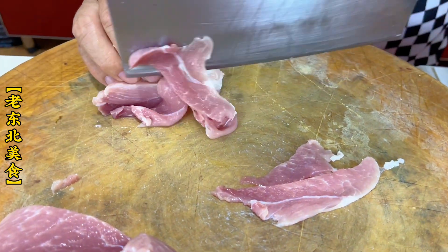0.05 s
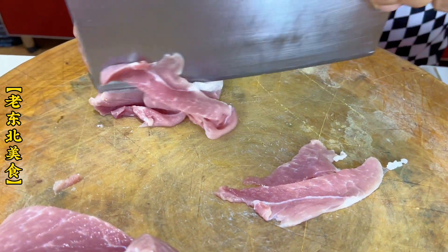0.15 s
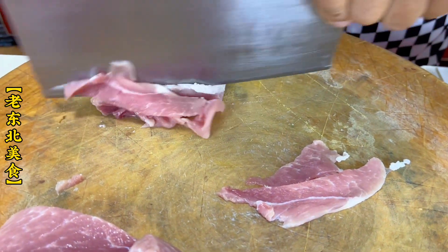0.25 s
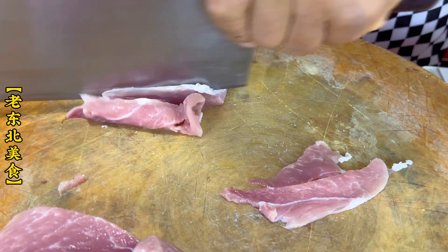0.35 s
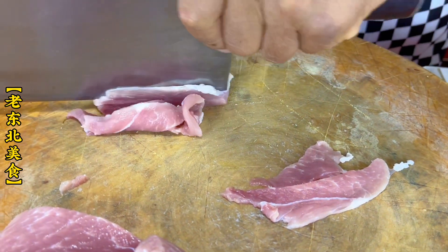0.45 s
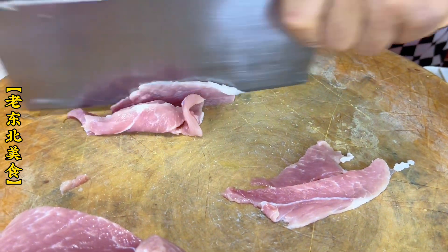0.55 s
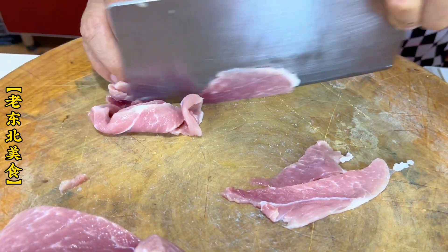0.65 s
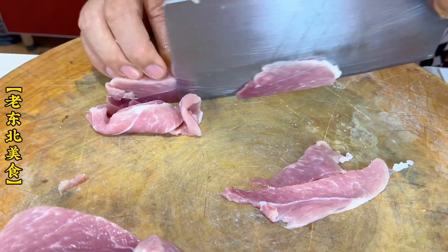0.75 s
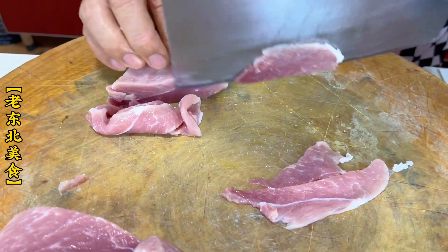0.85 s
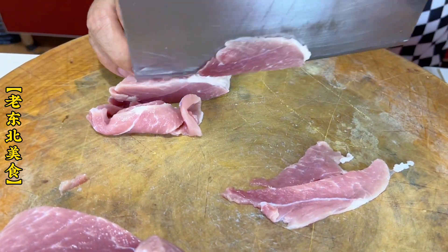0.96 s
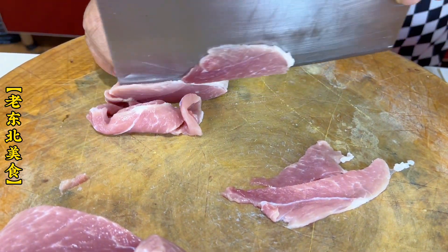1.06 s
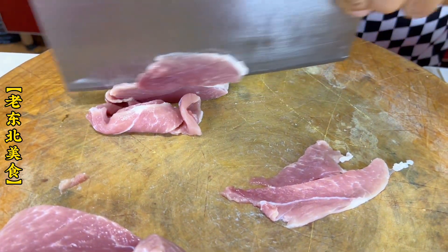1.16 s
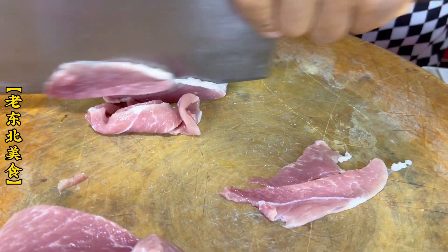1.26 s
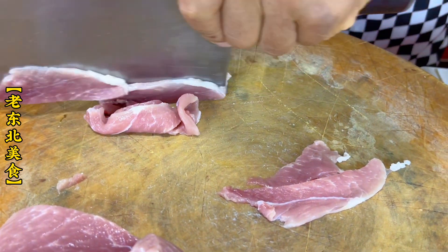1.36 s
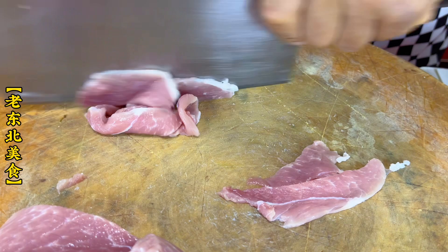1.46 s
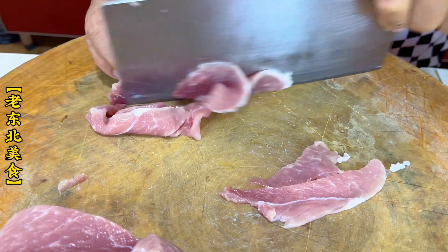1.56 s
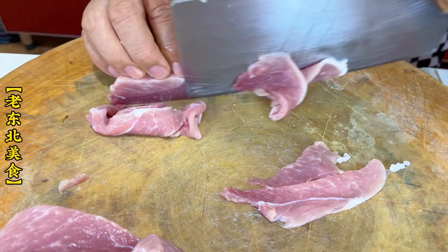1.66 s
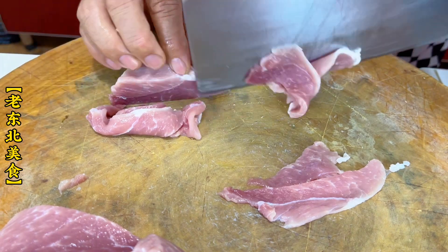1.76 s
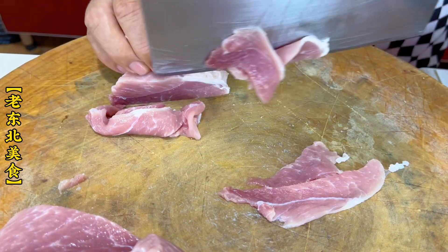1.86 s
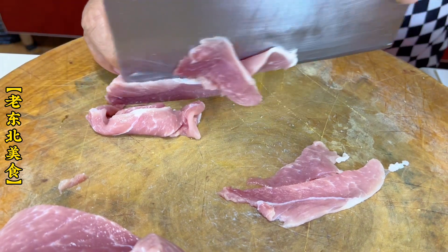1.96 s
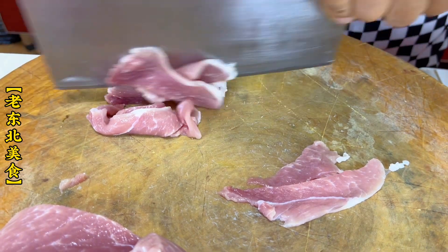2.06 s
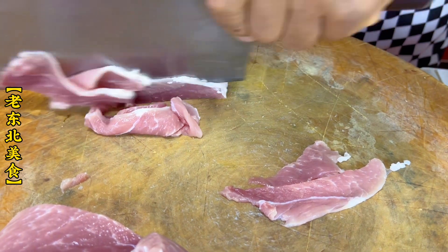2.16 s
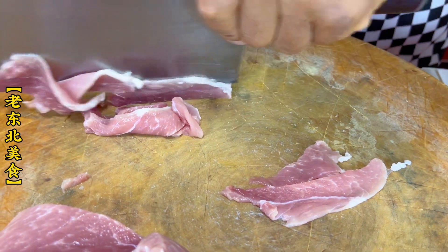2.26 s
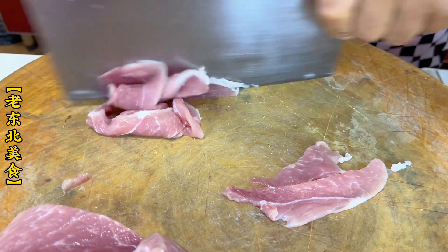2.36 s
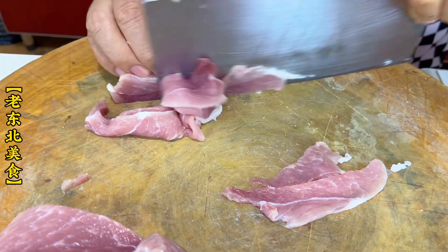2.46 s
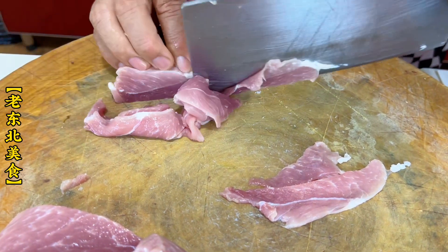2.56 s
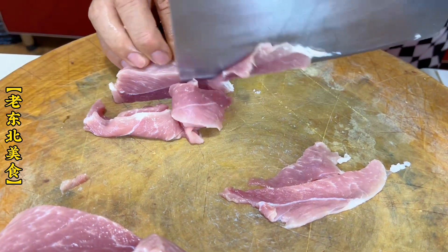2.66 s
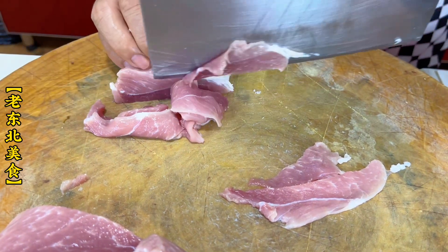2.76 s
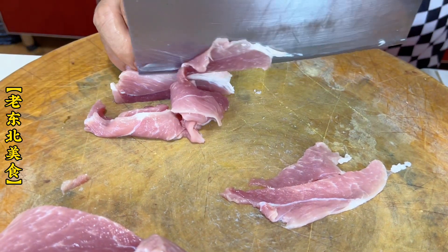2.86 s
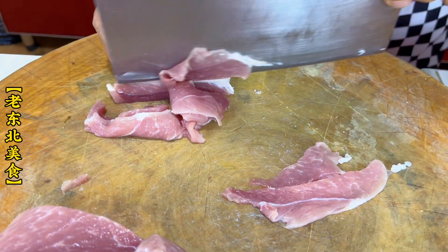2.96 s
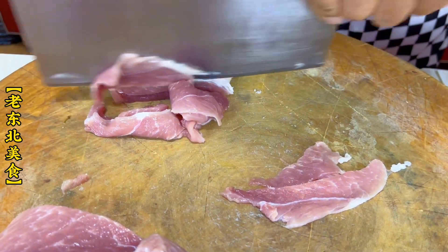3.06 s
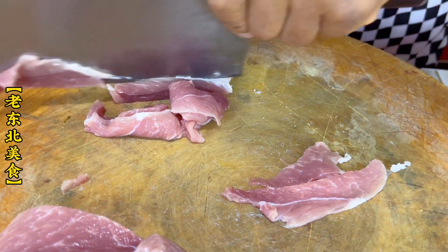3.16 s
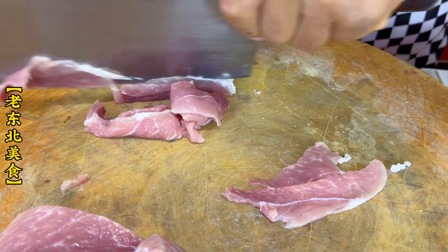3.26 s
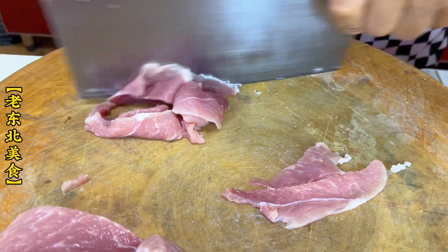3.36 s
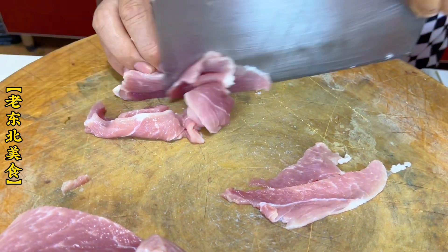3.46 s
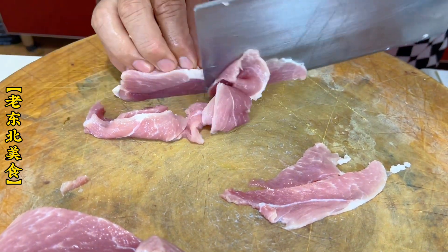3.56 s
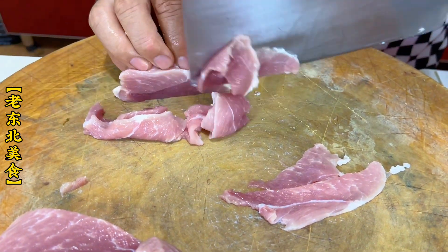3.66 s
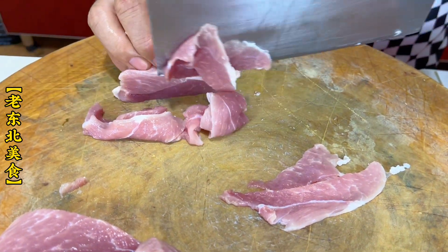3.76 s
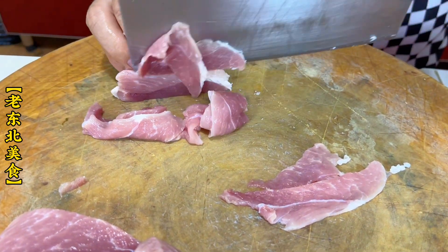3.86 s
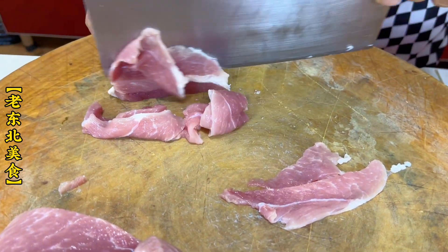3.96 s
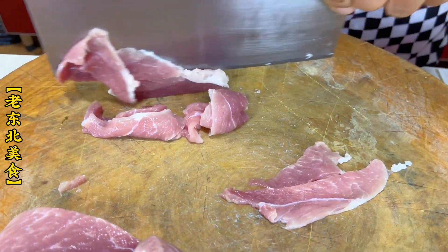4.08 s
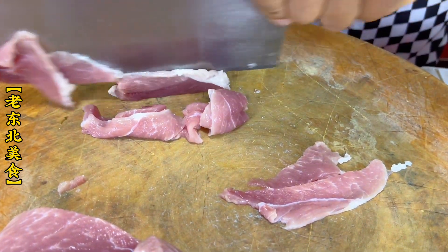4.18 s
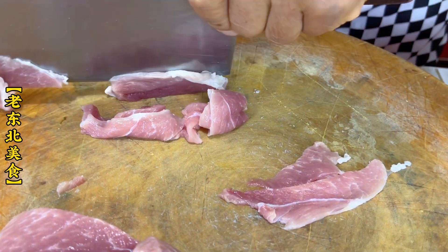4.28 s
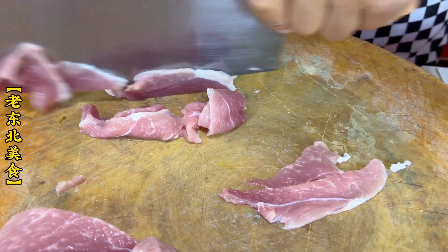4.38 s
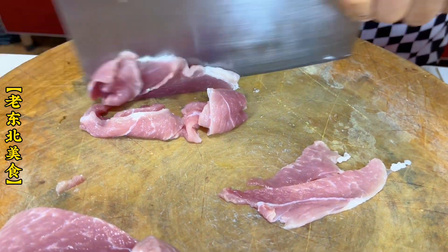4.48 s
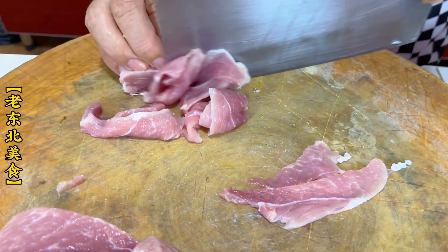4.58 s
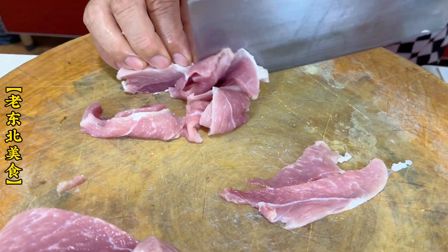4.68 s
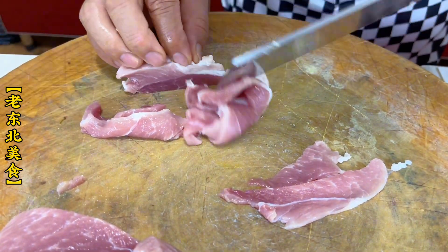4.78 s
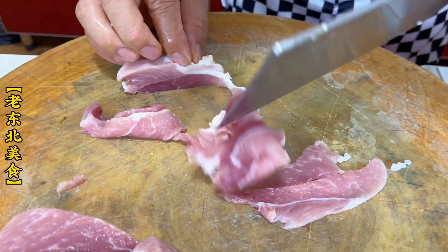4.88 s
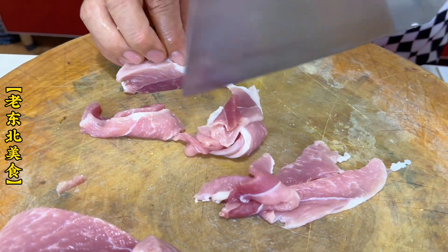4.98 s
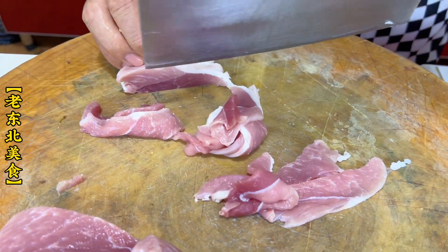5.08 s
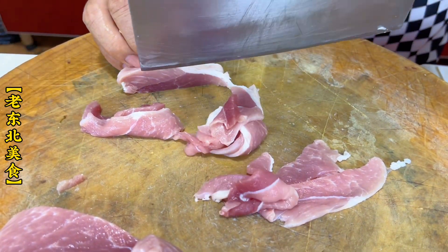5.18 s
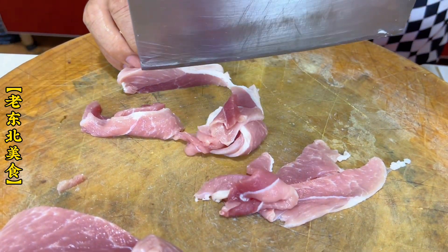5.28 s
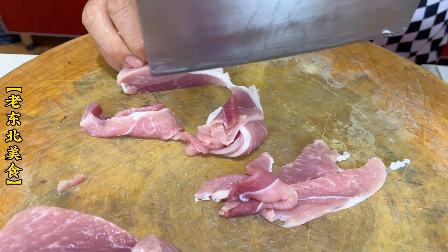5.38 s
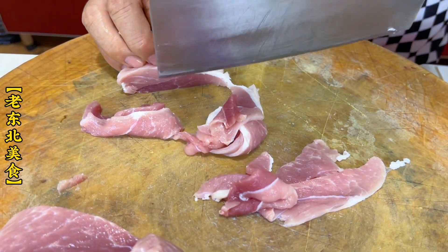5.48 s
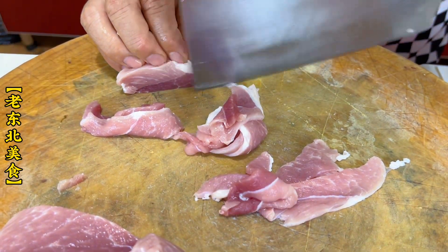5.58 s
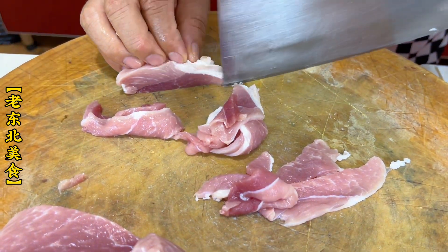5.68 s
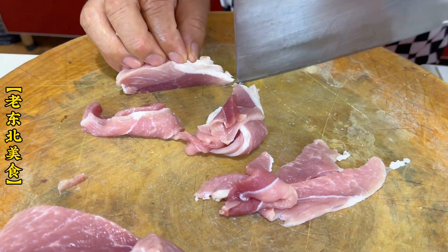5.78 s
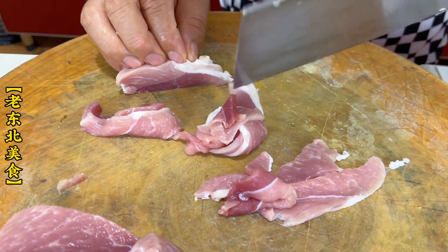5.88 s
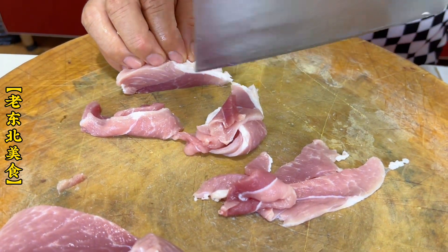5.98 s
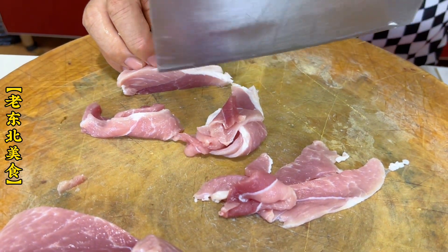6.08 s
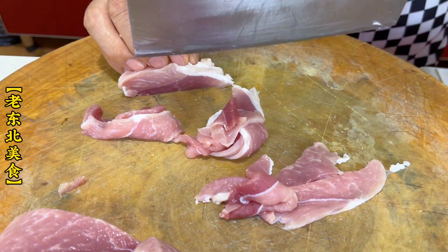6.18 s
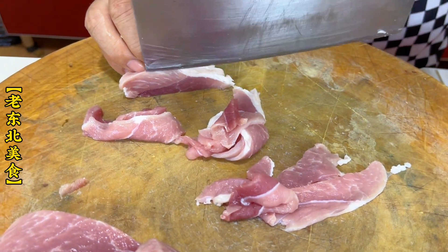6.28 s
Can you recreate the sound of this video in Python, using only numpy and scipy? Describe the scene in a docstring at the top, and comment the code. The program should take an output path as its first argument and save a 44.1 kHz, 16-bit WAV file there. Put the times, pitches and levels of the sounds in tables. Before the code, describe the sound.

A close stereo sound of a cleaver slicing raw pork on a thick wooden board in a small, hard-walled kitchen. A low fan hum and soft rush of air run throughout. At about 0.15 s a light, wet, grainy draw swells and fades; at 0.5 s a stronger rasping push bites in and meets the board at 0.6 s with a dull, deep thud. The pair repeats: draws near 1.1, 2.0, 2.95 and 3.9-4.3 s, the last broken and hesitant; pushes near 1.4, 2.3, 3.3 and 4.4 s, with thuds at 1.55, 2.45, 3.45 and 4.57 s, the one at 3.45 especially low and soft. Small damped steel ticks fall near 1.0, 1.95 and 3.9 s, with a faint tap at 1.94 s. After a barely audible slide at 4.7 s, mostly fan remains until 5.64 s, when one loud, harder, woody knock with a crack and slight scrape lands, decaying briefly into fan hum.

```python
"""A cleaver slices raw pork on a thick wooden board in a small kitchen, close to the microphone.
Light draws and harder pushes are wet stick-slip friction: dense random clicks coloured by the blade.
The edge excites the board's modes in a thud and grinds on the wood; light touches make the blade tick.
At the end it knocks once on the board. Decaying noise forms the room; a fan hums in a rush of air."""
import sys
import numpy as np
from scipy import signal
from scipy.fft import rfft, irfft, next_fast_len
from scipy.io import wavfile
from scipy.ndimage import uniform_filter1d

SR = 44100
rng = np.random.default_rng(int(sys.argv[2]) if len(sys.argv) > 2 else 0)


def generate_wav(sig):
    """Save sig (samples, or channels by samples) to the path in sys.argv[1] as 16-bit PCM at SR."""
    pcm = np.round(np.clip(np.atleast_2d(sig).T, -1, 1) * 32767).astype(np.int16)
    wavfile.write(sys.argv[1], SR, pcm)


N = 279329
TIME = np.arange(N) / SR
HZ = np.maximum(np.arange(N + 1) * SR / (2 * N), 1)

# All levels are relative.
# blade drawn over the meat: start_s, length_s, fastest_share (of length, 0-1), level_db,
# treble_db (relative to the rasp)
DRAW_STROKES = [(0.146, 0.35, 0.61, -56, -7), (1.081, 0.33, 0.78, -56, -5.5),
                (1.978, 0.32, 0.59, -54, -6.5), (2.953, 0.33, 0.57, -59, -6.5),
                (3.852, 0.051, 0.6, -56.5, -10), (3.941, 0.19, 0.33, -61.5, -9.5),
                (4.061, 0.31, 0.62, -58.5, -5.5), (4.680, 0.23, 0.27, -73.5, -9),
                (5.641, 0.25, 0.12, -63, -5)]
# blade pushed through the meat: start_s, reach_board_s (after start), entry_db, board_db,
# treble_db (relative to the rasp), ease_db_per_s (after reaching the board)
PUSH_STROKES = [(0.507, 0.12, -55.5, -46, -8.5, 124), (1.422, 0.14, -56, -45, -7, 132),
                (2.304, 0.17, -51, -47.5, -9, 165), (3.287, 0.18, -52.5, -53, -6, 118),
                (4.373, 0.21, -54, -53, -7, 108)]
# spectral envelope of the draws: frequency_hz, gain_db
DRAW_SPECTRUM = [(300, -26), (750, 8.5), (1250, 4.5), (1800, -2.5), (2900, 3.5), (4500, 0.5), (6500, 0.5),
                 (8500, -10.5), (10200, -9.5), (12500, -18.5), (15000, -26)]
# spectral envelope of the pushes: frequency_hz, gain_db
PUSH_SPECTRUM = [(30, -16), (170, 9), (450, 3), (750, 10.5), (1150, 2), (1750, -1), (2800, 3), (4500, -1),
                 (6500, -3.5), (8700, -18.5), (11300, -19.5), (13000, -27), (15000, -36)]
# resonances of the rubbed blade: frequency_hz, width_hz, lift_db
BLADE_RESONANCES = [(1223, 136, 8), (2340, 170, 3.5), (3060, 160, 3.5), (4450, 140, 5), (6240, 180, 6),
                    (10040, 360, 4)]
# correlation of the rubbing at the two ports: frequency_hz, likeness (0-1)
RUB_CORRELATION = [(300, 1), (750, 0.68), (1200, 0.95), (1700, 0.64), (10000, 0.54)]
# edge meets the board: start_s, level_db, contact_cutoff_hz (lower is softer), rock_db
BOARD_KNOCKS = [(0.625, -5.5, 222, -35), (1.553, -6, 167, -32), (1.941, -21.5, 400, -59),
                (2.454, -9, 156, -40), (3.461, -3, 90, -32), (4.568, -8.5, 132, -39.5),
                (5.641, 2, 1050, -27.5)]
# modes of the board: frequency_hz, width_hz, gain_db
BOARD_MODES = [(69.8, 60, 33), (118.3, 67, 33.5), (187.4, 28.5, 35), (291.4, 37, 31), (424, 140, 21),
               (523, 117, 17.5), (720, 71, 22), (970, 160, 17.5), (1275, 130, 13), (1567, 77, 13.5),
               (1960, 36, 11), (3180, 210, 9.5)]
# edge grinding along the wood: centre_s, half_length_s, level_db, frequency_hz
EDGE_GRINDS = [(0.627, 0.01, -36.5, 733), (1.547, 0.013, -40, 644), (2.446, 0.013, -53.5, 940),
               (3.384, 0.055, -53, 1195), (4.45, 0.049, -51, 1155), (5.644, 0.0048, -33, 938)]
# light touches of the blade: start_s, level_db, tilt_db_per_octave
BLADE_TICKS = [(1.026, -41.5, -0.5), (1.965, -41, -1.5), (3.881, -37.5, 2.5), (4.789, -63.5, 9.5)]
# modes of the hand-damped blade: frequency_hz, level_db, t60_s
BLADE_MODES = [(1213, 5.5, 0.025), (1319, 2.5, 0.047), (1864, -2, 0.037), (2200, -7, 0.027),
               (3300, -10, 0.097), (3850, 0.5, 0.016), (4420, -8.5, 0.017), (5480, -8, 0.01),
               (6760, -6.5, 0.034), (11700, -22, .015)]
# spectral shape of the kitchen's air noise: frequency_hz, density_db
AIR_SPECTRUM = [(15, -63), (25, -10.5), (49, -16), (86, 2.5), (124, -8.5), (208, -6), (306, -12),
                (340, -19.5), (377, -16), (407, -22.5), (463, -18), (979, -28), (1560, -26), (2240, -42.5),
                (12000, -70), (15600, -109), (22000, -120)]
# tones of the fan: frequency_hz, level_db
FAN_TONES = [(78, -59.5), (102.3, -52), (204.6, -58), (371.4, -69.5), (4194, -94.5)]
# correlation of diffuse sound, left to right: frequency_hz, likeness (0-1)
DIFFUSE_CORRELATION = [(50, 1), (250, 0.73), (500, 0.3), (1000, 0), (12000, 0.19)]
# phase of near sound between the two microphone ports: frequency_hz, left_lead_rad
PORT_LEAD = [(100, -0.15), (550, -0.24), (750, 0.68), (1100, 1.6), (2500, 1.13), (7000, 1.48),
             (11500, 1.04)]
# sensitivity of the two ports: frequency_hz, left_minus_right_db
PORT_SENSITIVITY = [(100, .4), (420, 1.5), (700, -6), (1150, 0), (1550, -3.5), (1850, 2.5), (2700, -1),
                    (4000, 2.5), (6500, -2), (11000, 0)]


def draw_strokes():
    """Friction grows with sliding speed: each draw speeds up and slows down in one arch."""
    rasp_law, hiss_law = 1.2, 2.13  # amplitude grows as these powers of speed
    rasp, hiss = np.zeros(N), np.zeros(N)
    for start, length, fastest, level_db, treble_db in DRAW_STROKES:
        turn = np.interp(TIME, [start, start + length * fastest, start + length], [0, 1, 0])
        speed = np.sin(np.pi / 2 * turn)
        rasp += undb(level_db) * speed ** rasp_law
        hiss += undb(level_db + treble_db) * speed ** hiss_law
    return rasp, hiss


def push_strokes():
    """Friction follows pressure: the edge bites, bears down to the board, then eases off and stops."""
    bite_s, length_s, stop_s = 0.051, 0.39, 0.066  # stop_s is the last part of length_s
    rasp, hiss = np.zeros(N), np.zeros(N)
    for start, reach_s, entry_db, board_db, treble_db, ease_db_per_s in PUSH_STROKES:
        t = TIME - start
        ramp = np.clip(np.minimum(t / bite_s, (length_s - t) / stop_s), 0, 1)
        moving = np.sin(np.pi / 2 * ramp) ** 2
        pressure_db = np.interp(t, [0, reach_s], [entry_db, board_db])
        eased_db = ease_db_per_s * np.maximum(t - reach_s, 0)
        stroke = moving * undb(pressure_db - eased_db)
        rasp += stroke
        hiss += stroke * undb(treble_db)
    return rasp, hiss


def friction(strokes, colour, slips_per_s, catch_db, patchy_db, rasp_db, hiss_db):
    """Stick-slip: wet fibres catch and slip on steel as dense tiny clicks, coloured by the blade."""
    happens = rng.random(N) < slips_per_s / SR
    slip_size = happens * undb(catch_db * walk(45))
    # slips lie all along the edge, so the two ports hear them differently, except in the bass
    mid, side = mid_and_side(RUB_CORRELATION, lambda: slip_size * rng.standard_normal(N))
    # each patch of meat under the blade favours its own pitches
    slips = mottle(ports(mid) + np.array([side, -side]), patchy_db)
    colour_db = over_hz(colour)
    for hz, width, lift_db in BLADE_RESONANCES:
        colour_db = colour_db + lift_db / (1 + (2 * (HZ - hz) / width) ** 2)
    gain = undb(colour_db)
    low = 1 / (1 + (HZ / 7000) ** 12)
    rasp = unit(shape(slips, gain * low))
    hiss = unit(shape(slips, gain * (1 - low)))
    rasp_envelope, hiss_envelope = strokes
    return undb(rasp_db) * rasp * rasp_envelope + undb(hiss_db) * hiss * hiss_envelope


def knocks(bend_lag_s, crack_db, crack_t60, crack_hz, rock_s, rock_hz, rock_t60):
    """Impact excites the board's modes; a moment later the heavy board rocks on its table."""
    out, t = np.zeros(N), TIME[:SR // 2]
    f = np.maximum(np.fft.rfftfreq(len(t), 1 / SR), 1)
    board = 0
    for k, (hz, width, gain_db) in enumerate(BOARD_MODES):
        # neighbouring modes swing in opposite directions at the listening point
        board = board + (-1) ** k * undb(gain_db) / (1 + 1j * (f ** 2 - hz ** 2) / (f * width))
    # bending waves are slower at low pitch, so the knock falls from a tock into a thud
    bending = np.exp(-2j * np.pi * 2 * bend_lag_s * np.sqrt(f * BOARD_MODES[0][0]))
    hard_hz = BOARD_KNOCKS[-1][2]
    for start, level_db, soft_hz, rock_db in BOARD_KNOCKS:
        body = irfft(board * bending / (1 + 1j * f / soft_hz) ** 2)
        # the harder the contact, the more it crushes wood fibres into a crack
        crush = rng.standard_normal(len(t)) * swell(t, 0.0015, crack_t60) * (soft_hz / hard_hz) ** 2
        crack = undb(crack_db) * irfft(rfft(crush) / (1 + 1j * f / crack_hz) ** 3)
        add(out, start, undb(level_db) * (body + crack)[:len(t) // 2])
        upper = 0.77 * ring(t, 211, 0.12) / np.hypot(1, (400 / soft_hz) ** 2)
        add(out, start + rock_s, undb(rock_db) * (ring(t, rock_hz, rock_t60) + upper))
    return out


def grinds(width_hz):
    """Sliding contact: the edge drags over wood and rubs a narrow band of it into sound."""
    out = np.zeros(N)
    for centre, half_s, level_db, hz in EDGE_GRINDS:
        band = 1 / (1 + (2 * (HZ - hz) / width_hz) ** 2)
        rub = unit(shape(rng.standard_normal(N), band))
        out += undb(level_db) * rub * np.exp(-((TIME - centre) / half_s) ** 2)
    return out


def ticks(scuff_db, scuff_rise_s, scuff_t60, scuff_hz):
    """Light impact: the blade's damped modes ring briefly under a tiny scuff of noise."""
    steel, scuff, t = np.zeros(N), np.zeros(N), TIME[:SR // 5]
    for start, level_db, tilt_db in BLADE_TICKS:
        modes = np.zeros(len(t))
        for hz, mode_db, t60 in BLADE_MODES:
            late = t - 0.0037 * rng.random()  # the modes start at slightly scattered times
            modes += undb(mode_db + tilt_db * np.log2(hz / 3000)) * ring(late, hz, t60)
        add(steel, start, undb(level_db) * modes / 2)
        noise = rng.standard_normal(len(t)) * swell(t, scuff_rise_s, scuff_t60)
        add(scuff, start, undb(level_db + scuff_db) * noise)
    return steel + shape(scuff, 1 / (1 + (HZ / scuff_hz) ** 4))


def ports(x):
    """Phase difference: near sound is offset between the ports; long waves reach both nearly alike."""
    half = np.exp(.5j * over_hz(PORT_LEAD) * np.minimum(HZ / 550, 1))
    return np.array([shape(x, half), shape(x, 1 / half)])


def room(x, low_db, high_db, low_t60, high_t60, gap_s):
    """Reverberation from hard kitchen walls: a low boom and a briefer bright tail of decaying noise."""
    low = 1 / (1 + (HZ / 600) ** 2)
    response = 0
    for band, level_db, t60 in [(low, low_db, low_t60), (1 - low, high_db, high_t60)]:
        unit_energy = np.sqrt(2 * np.log(1000) / (t60 * SR))  # evens out the length of the decay
        response = response + undb(level_db) * diffuse(band) * fade(TIME - gap_s, t60) * unit_energy
    return signal.fftconvolve(x[None], response[:, :SR], axes=1)[:, :N]


def background(air_db, patchy_db, waver_db, drift_rad):
    """Turbulence makes the fan's broadband rush of air; wavering sine tones make its hum."""
    air = unit(mottle(diffuse(undb(over_hz(AIR_SPECTRUM))), patchy_db)) * undb(air_db)
    hum = np.zeros(N)
    for hz, level_db in FAN_TONES:
        amplitude = np.sqrt(2) * undb(level_db + waver_db * walk(7))
        hum += amplitude * np.sin(2 * np.pi * hz * TIME + drift_rad * walk(6))
    return air + hum


def mid_and_side(correlation, noise):
    """Partial correlation: two independent noises, weighted by how alike left and right are."""
    like = over_hz(correlation)
    return [shape(noise(), np.sqrt(1 + sign * like)) for sign in (1, -1)]


def diffuse(gain):
    """Diffuse field: stereo noise from all sides, with the bass alike left and right."""
    mid, side = mid_and_side(DIFFUSE_CORRELATION, lambda: rng.standard_normal(N))
    return shape(np.array([mid + side, mid - side]), gain) / np.sqrt(2)


def mottle(x, depth_db):
    """Spectral fluctuation: random patches of pitch swell and sink for a few hundredths of a second."""
    spectra = signal.stft(x, nperseg=512)[2]
    patches = rng.standard_normal(spectra.shape[1:])
    patches = uniform_filter1d(patches, size=3, axis=0)
    patches = uniform_filter1d(patches, size=5, axis=1)
    return signal.istft(spectra * undb(depth_db * unit(patches)))[1][:, :N]


def walk(rate):
    """Smoothed random steps, `rate` per second: a wander with a spread near 1."""
    k = int(SR / rate)
    steps = np.repeat(rng.standard_normal(N // k + 1), k)[:N]
    return 1.55 * uniform_filter1d(steps, k)


def fade(t, t60):
    """Exponential decay from t = 0, falling 60 dB in t60 seconds."""
    return (t >= 0) * np.exp(-np.log(1000) * np.maximum(t, 0) / t60)


def ring(t, hz, t60):
    """Damped oscillation of one struck mode."""
    return np.sin(2 * np.pi * hz * t) * fade(t, t60)


def swell(t, rise_s, t60):
    """Contact envelope: it builds up for a moment and dies away."""
    return (1 - np.exp(-(t / rise_s) ** 2)) * fade(t, t60)


def undb(db):
    """Decibels to amplitude gain."""
    return 10 ** (np.asarray(db) / 20)


def over_hz(points):
    """Interpolate (Hz, value) points along a log-frequency axis."""
    hz, value = np.transpose(points)
    return np.interp(np.log(HZ), np.log(hz), value)


def shape(x, gain):
    """Linear filtering by a gain given for every frequency."""
    size = next_fast_len(N + SR, real=True)
    grid = np.arange(size // 2 + 1) * SR / size
    return irfft(rfft(x, size) * np.interp(grid, HZ, gain), size)[..., :N]


def unit(x):
    """Normalise to rms 1."""
    return x / np.sqrt(np.mean(x ** 2))


def add(track, start, sound):
    """Superpose a sound on a track from a start in seconds."""
    i = int(start * SR)
    track[i:i + len(sound)] += sound[:N - i]


def scene():
    """Superposition of strokes, wood, ticks, their reverberation and the fan."""
    draw = friction(draw_strokes(), DRAW_SPECTRUM, slips_per_s=12000, catch_db=0.72,
                    patchy_db=3.5, rasp_db=1.5, hiss_db=-3.0)
    push = friction(push_strokes(), PUSH_SPECTRUM, slips_per_s=10000, catch_db=1,
                    patchy_db=4.0, rasp_db=3, hiss_db=-2.5)
    slicing = draw + push
    wood = knocks(bend_lag_s=0.00311, crack_db=-31.5, crack_t60=0.028, crack_hz=6000,
                  rock_s=0.045, rock_hz=78.6, rock_t60=0.32)
    wood += grinds(width_hz=215)
    taps = ticks(scuff_db=-10.0, scuff_rise_s=0.002, scuff_t60=0.16, scuff_hz=5300)
    walls = room(slicing[0] + wood + taps / 2, low_db=-6.5, high_db=-5.0,
                 low_t60=0.31, high_t60=0.18, gap_s=0.0061)
    fan = background(air_db=-47, patchy_db=2.5, waver_db=2.0, drift_rad=0.98)
    return slicing + ports(wood + taps) + walls + fan


def record(dry):
    """Frequency response: each port colours the sound; the deepest bass and the top are cut."""
    half = undb(over_hz(PORT_SENSITIVITY) / 2)
    heard = np.array([shape(dry[0], half), shape(dry[1], 1 / half)])
    bass_cut = signal.butter(2, 25, "high", fs=SR, output="sos")
    top_cut = signal.ellip(8, .2, 70, 14600, fs=SR, output="sos")
    return signal.sosfilt(top_cut, signal.sosfilt(bass_cut, heard))


dry = scene()
out = record(dry)
generate_wav(out)
```